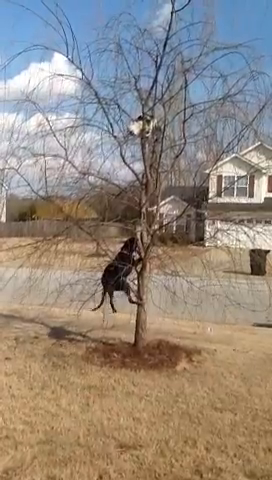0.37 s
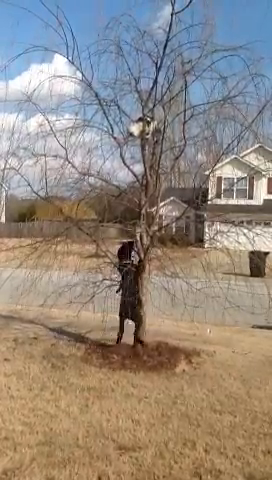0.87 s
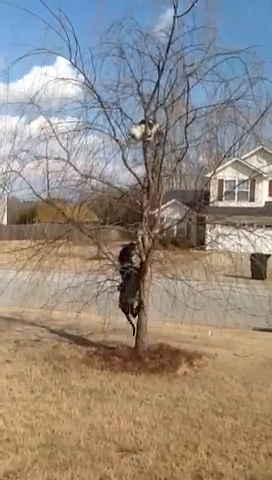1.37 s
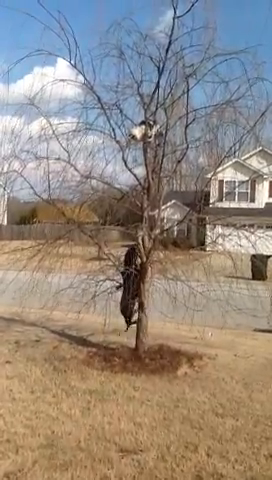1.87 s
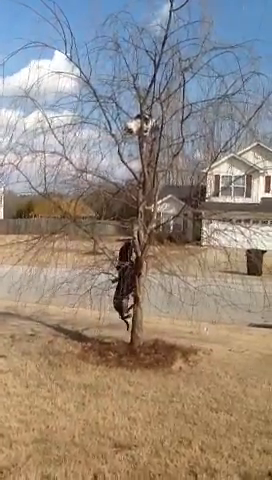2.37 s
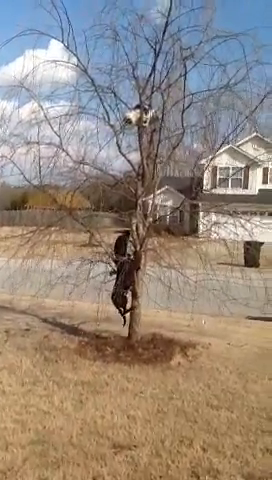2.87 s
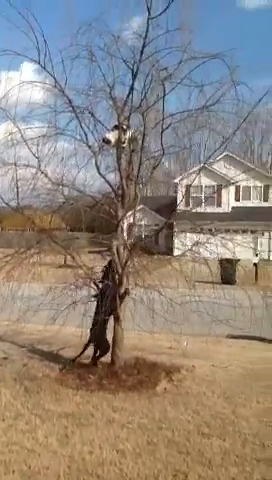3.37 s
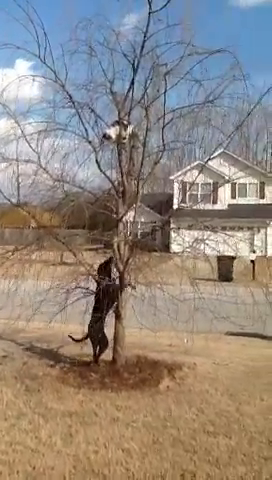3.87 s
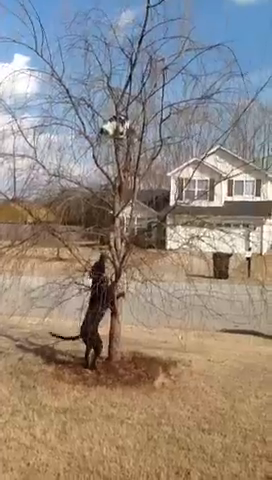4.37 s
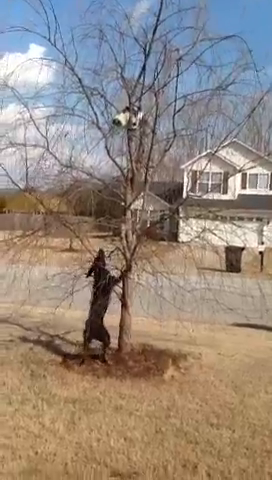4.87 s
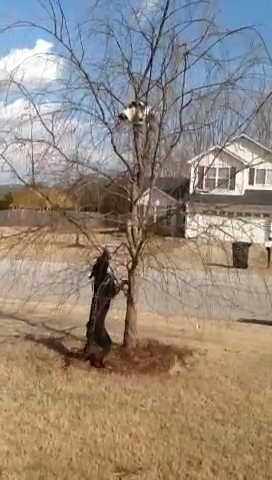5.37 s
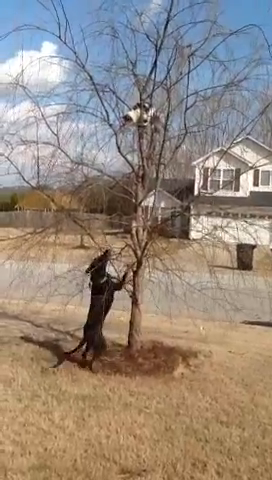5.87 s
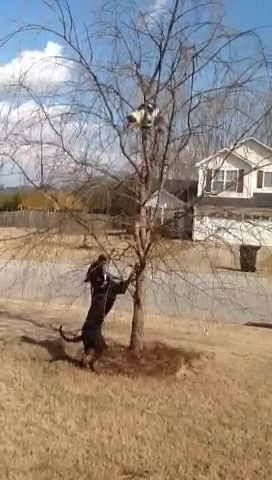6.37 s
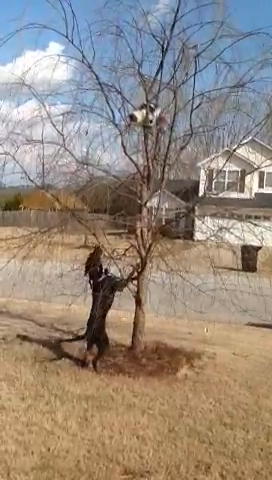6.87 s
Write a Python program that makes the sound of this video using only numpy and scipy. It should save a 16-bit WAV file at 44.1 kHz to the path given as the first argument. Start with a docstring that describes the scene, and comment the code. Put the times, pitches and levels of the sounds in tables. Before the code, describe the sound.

A quiet suburban yard with soft airy hiss. From 0.15 to 0.55 seconds a hound close by gives little low whimpers and thin arching squeaks, its claws scraping bark, with more scrapes around 0.9 and 1.1. Wind puffs bump the microphone near 1.0-1.3, and a far bird chirps upward at 1.2, then downward at 2.1. Thin squeaks return at 1.67-1.95. At 2.66 a long high whistle-like whine swells and breaks at 3.03 into the first bay, wavering and hoarse, until 3.6. Wind thumps from 3.4 to 4.2, with scrapes and twig ticks around 3.8-4.5. The second bay, 4.2-5.35, starts moderate and grows loud, cracking between registers. Its dull echo fades off the houses across the street. After a pause, a tiny squeak at 5.9 opens the third, longest bay, rough and fluttering, dipping near 6.65, then ringing loudly until the end at about 7.2.

```python
"""Hound baying under a tree

Close to the microphone a hound whimpers, squeaks, then bays three times, its voice jumping between registers:
harmonics of one wavering phase, with fuzzy bands and breath noise, pass through throat and muzzle filters.
Houses across the street return a dull noise-tail echo. A far bird chirps twice as gliding sines, claws scrape
bark and twigs tick as shaped noise. Wind thumps on the microphone as short pulses over a rumble,
and a quiet suburban hiss of coloured noise lies beneath."""
import sys
import numpy as np
from scipy import signal
from scipy.fft import rfft, irfft, next_fast_len
from scipy.io import wavfile
from scipy.ndimage import uniform_filter1d, map_coordinates

SR = 44100
rng = np.random.default_rng(int(sys.argv[2]) if len(sys.argv) > 2 else 0)


def waveform_to_disk(signal):
    """Save audio, clipped to [-1, 1], as 16-bit WAV at the path in sys.argv[1]."""
    frames = np.transpose(np.atleast_2d(signal))
    scaled = np.clip(frames, -1, 1) * 32767
    samples = np.round(scaled).astype(np.int16)
    wavfile.write(sys.argv[1], SR, samples)


def rack_gain(trim_db):
    """Turn a fader trim in dB into the linear factor to multiply a signal by."""
    fader = np.asarray(trim_db, float)
    return 10 ** (fader / 20)


N = 318834  # samples


def unit(x):
    """Bring to rms 1."""
    return x / np.sqrt(np.mean(x ** 2) + 1e-20)


def along(points, hz):
    """Interpolate (Hz, value) points on a log frequency axis."""
    f, v = np.transpose(points)
    return np.interp(np.log(hz + 1), np.log(f + 1), v)


def curves(rows):
    """One value per sample for each column after the time."""
    s, *cols = np.transpose(rows)
    return [np.interp(np.arange(N) / SR, s, c) for c in cols]


def phrases(tables, fade_s):
    """A gate that is open while any table sounds, and the joined curves of them all."""
    t = np.arange(N) / SR
    gate = 0
    for rows in tables:
        inside = np.minimum(t - rows[0][0], rows[-1][0] - t)
        gate = gate + np.clip(inside / fade_s + 1, 0, 1)
    return np.minimum(gate, 1) ** 2, curves([row for rows in tables for row in rows])


def wobble(rate):
    """A smooth random curve, rate knots a second."""
    knots = rng.standard_normal(int(N * rate / SR) + 4)
    return map_coordinates(knots, [np.arange(N) * rate / SR])


def filtered(x, spectrum):
    """Shape x by (Hz, dB) points."""
    m = next_fast_len(N + 8192)
    gain = rack_gain(along(spectrum, np.fft.rfftfreq(m, 1 / SR)))
    return irfft(rfft(x, m) * gain, m)[:N]


def noise(spectrum):
    """Coloured noise of rms 1."""
    return unit(filtered(rng.standard_normal(N), spectrum))


def phase(hz):
    """Running phase in radians of a moving pitch."""
    return 2 * np.pi * np.cumsum(hz) / SR


def sines(turn, levels_db, first):
    """Successive harmonics of a phase, each at its rms level."""
    return sum(np.sqrt(2) * rack_gain(db) * np.sin((first + k) * turn) for k, db in enumerate(levels_db))


# colour of the suburban hiss: freq_hz [Hz], density_db [dB per Hz, relative]
AIR_COLOUR = [(30, -53.5), (120, -11.5), (250, -1), (500, -1), (1200, -6.5), (2500, -10.5), (6000, -17),
              (15300, -18)]


def air():
    """Open-air hiss: coloured noise whose level drifts slowly."""
    return rack_gain(-61.5 + 2.6 * wobble(6.5)) * noise(AIR_COLOUR)


# wind rumble before the bass cut: time_s [s], level_db [dB]
WIND_LEVEL = [(.7, -65), (1.1, -52.5), (1.5, -64), (3.1, -65), (3.5, -52), (4.25, -52.5), (4.6, -56.5),
              (5.6, -66)]
# colour of the rumble: freq_hz [Hz], density_db [dB per Hz, relative]
RUMBLE_COLOUR = [(25, -66), (40, -33), (100, -3.5), (170, 1.5), (260, -2), (400, -33.5)]
# puffs on the microphone: start_s [s], level_db [dB, before trim and bass cut]
WIND_PUFFS = [(1.03, -27), (1.059, -26.5), (1.161, -31.5), (1.282, -35), (3.377, -19.5), (3.464, -26.5),
              (3.503, -29), (3.603, -26), (3.747, -20.5), (3.765, -21.5), (3.829, -27), (3.859, -18),
              (4.103, -33.5), (4.157, -15), (5.216, -44.5)]


def wind():
    """A lumpy rumble, and single puffs that push the membrane for about a cycle."""
    t = np.arange(N) / SR
    lumps = rack_gain(4 * wobble(25))
    out = rack_gain(curves(WIND_LEVEL)[0]) * unit(lumps * noise(RUMBLE_COLOUR))
    for start_s, level_db in WIND_PUFFS:
        hz = 165 * (1 + 0.051 * rng.standard_normal())
        cycles = (t - start_s) * hz - 1.2  # zero at the middle of the puff
        out += rack_gain(level_db - 7.5) * np.exp(-(cycles / 0.5) ** 2) * np.sin(2 * np.pi * cycles)
    return filtered(out, [(40, -13.5), (110, 0)])


# decay of the street's echo: freq_hz [Hz], t60_s [s to fall 60 dB]
HOUSE_DECAY = [(300, 0.41), (1200, 1.295), (2400, 1.05), (6000, 1.16)]


def street(x):
    """House fronts across the street blur their echoes into a dull tail of decaying noise."""
    hz, t, z = signal.stft(rng.standard_normal(SR), SR, nperseg=256)
    decay = rack_gain(-60 * t / along(HOUSE_DECAY, hz)[:, None])
    tail = signal.istft(z * decay, SR, nperseg=256)[1]
    delayed = np.pad(tail, (1500, 0))  # samples, 34 ms
    tail = rack_gain(-10.0) * delayed / np.linalg.norm(tail)
    stirred = x * rack_gain(4.5 * wobble(70) - 1)  # moving air smears steady tones
    return filtered(signal.fftconvolve(stirred, tail)[:N], [(2300, -6.0), (3300, -14), (7000, -8)])


# far bird: peak_s [s], pitch_hz [Hz at the peak], glide [Hz per s], level_db [dB at the peak]
BIRD_CHIRPS = [(1.174, 2280, 5527, -41), (2.123, 2120, -2500, -40.5)]


def bird():
    """Short far notes: a gliding sine that swells and fades."""
    rise_s, fall_s, edge_db = 0.027, 0.016, -21.5
    shape = [(-rise_s, edge_db), (0, 0), (fall_s, edge_db)]
    notes = [[(peak_s + lag, hz + glide * lag, level_db + db) for lag, db in shape]
             for peak_s, hz, glide, level_db in BIRD_CHIRPS]
    gate, (hz, db) = phrases(notes, 0.0043)
    return gate * sines(phase(hz), [db], first=1)


# claws on bark: start_s [s], body_db [dB], treble_db [dB], both before the grain
CLAW_SCRAPES = [(.16, -59.5, -66.5), (0.519, -47.5, -62), (0.871, -57.5, -54), (1.129, -55, -80.5),
                (2.102, -50.5, -85), (3.769, -60.5, -62), (3.939, -57, -86), (3.999, -59, -74.5)]
# twigs: start_s [s], level_db [dB, before a fixed lift]
TWIG_TICKS = [(3.904, -53.5), (3.916, -62.5), (4.129, -56), (4.3275, -44.5), (4.4931, -54.5)]


def claws():
    """Scrapes are grainy swells in the bark's body and its treble; twigs give one sharp tick."""
    t = np.arange(N) / SR
    grain = rack_gain(1.24 * wobble(370))
    body = grain * noise([(250, -40), (500, 0), (1200, 0), (2500, -8), (5000, -30)])
    fizz = grain * noise([(1500, -40), (4000, 0), (15000, -3)])
    out = np.zeros(N)
    for start_s, body_db, treble_db in CLAW_SCRAPES:
        progress = np.clip((t - start_s) / 0.082, 0, 1)
        swell = np.sin(np.pi * progress ** 0.34)  # peaks early
        out += swell * (rack_gain(body_db) * body + rack_gain(treble_db) * fizz)
    for start_s, level_db in TWIG_TICKS:
        decay_db = 60 * np.clip(t - start_s, 0, 1) / 0.015
        out += (t > start_s) * rack_gain(level_db + 10.5 - decay_db) * fizz
    return out


# steady whistle under the squeaks, one table a phrase: time_s [s], pitch_hz [Hz], level_db [dB]
HELD_PHRASES = [
    [(1.75, 2430, -63), (1.815, 2394, -65)],
    [(1.865, 2430, -59), (1.93, 2310, -65), (1.945, 2380, -75)],
]
# its harmonics 1-3: over_db [dB over level_db]
HELD_HARMONICS = [3.5, -10, -0.5]


def held_whistle():
    """A steady whistle whose harmonics flicker separately."""
    gate, (pitch, db) = phrases(HELD_PHRASES, 0.005)
    turn = phase(pitch * (1 + 0.00454 * wobble(54)))
    return gate * sum(rack_gain(5 * wobble(50)) * sines(turn, [db + over_db], first=k)
                      for k, over_db in enumerate(HELD_HARMONICS, 1))


# second whistle, one table a phrase: time_s [s], pitch_hz [Hz], level_db [dB, 3rd harmonic before flicker]
SECOND_PHRASES = [
    [(1.76, 3100, -62), (1.79, 3200, -60)],
    [(1.885, 3040, -57), (1.935, 3170, -59)],
    [(2.87, 3080, -61), (2.92, 3070, -52), (3.02, 3120, -56)],
]


def second_whistle():
    """A second pitch, heard only by its overtones 2-4."""
    gate, (pitch, db) = phrases(SECOND_PHRASES, 0.0082)
    turn = phase(pitch * (1 + .005 * wobble(60)))
    return gate * rack_gain(2.5 * wobble(40)) * sines(turn, [db - 8, db, db - 8], first=2)


# squeaks: start_s [s], rise_s [s], fall_s [s], from_hz [Hz], top_hz [Hz],
# level_db [dB, before flicker and filter], second_db [dB, 2nd harmonic over the 1st]
SQUEAK_ARCHES = [(0.309, 0.034, 0.028, 2560, 3600, -54.5, -22), (0.43, 0.035, .017, 2230, 2710, -55, -8),
                 (1.668, 0.03, 0.036, 3200, 3470, -57.5, -3),
                 (1.751, 0.032, 0.036, 2330, 3310, -52.5, -3.5), (1.868, 0.076, 0.022, 2270, 3750, -55, -1)]
# whimpers: start_s [s], length_s [s], from_hz [Hz], to_hz [Hz], level_db [dB, before flicker and filter]
WHIMPER_SLIDES = [(0.153, 0.089, 323, 479.4, -50.5), (0.275, 0.045, 3080, 2560, -59.5),
                  (0.508, 0.046, 714, 373.3, -46.5), (1.034, 0.017, 426, 428, -42.5),
                  (5.89, 0.036, 3400, 3200, -54)]
# long whistle: time_s [s], pitch_hz [Hz], first_db, second_db [dB, harmonics before flicker and filter]
LONG_WHISTLE = [(2.66, 3290, -63, -103), (2.74, 3300, -61.5, -51), (2.81, 3350, -54.5, -54.5),
                (2.86, 3280, -56, -50), (2.95, 3250, -57, -54), (3.03, 3340, -60, -93)]


def whine_shapes():
    """Squeaks arch up and fall to one rest pitch, whimpers slide one way: (s, Hz, 1st, 2nd harmonic dB)."""
    onset_db, end_db, rest_hz = -4, -7, 2350  # end levels are over the middle
    knee, knee_up = .5, .65  # most of the climb comes early: share of the rise time, share of the climb
    shapes = [LONG_WHISTLE]

    def add(points, level_db, second_db):
        shapes.append([(s, hz, level_db + db, level_db + db + second_db) for s, hz, db in points])

    for s, rise, fall, low, top, level_db, second_db in SQUEAK_ARCHES:
        add([(s, low, onset_db), (s + knee * rise, low + knee_up * (top - low), 0),
             (s + rise, top, 0), (s + rise + fall, rest_hz, end_db)], level_db, second_db)
    for s, length, a, b, level_db in WHIMPER_SLIDES:
        add([(s, a, onset_db), (s + length / 2, (a + b) / 2, 0), (s + length, b, end_db)], level_db, -16.5)
    return sorted(shapes)


def whines():
    """Thin whistles from nearly closed folds: three flickering harmonics and breath, with two more whistles."""
    gate, (pitch, first_db, second_db) = phrases(whine_shapes(), 0.0026)
    pitch = uniform_filter1d(pitch, size=500) * (1 + .011 * wobble(260))
    turn = phase(pitch)
    flicker_db, = curves([(2.5, 6), (2.6, 2.5), (3.1, 2.5), (3.2, 6)])  # the long whistle is steadier
    lines = sum(rack_gain(flicker_db * wobble(70) - 2) * sines(turn, [db], first=k)
                for k, db in enumerate([first_db, second_db, second_db - 20], 1))
    hiss = noise([(1200, -7.0), (2000, -4.0), (9000, -12.5), (15000, -15.5)])
    breath = rack_gain(first_db - 5.5) * (pitch > 1500) * hiss
    lines = filtered(lines, [(3700, 0), (4200, -15), (4600, 0), (5600, -6), (6300, 0)])
    return gate * (lines + breath) + held_whistle() + second_whistle()


# second vibration in the bays, one table a phrase: time_s [s], pitch_hz [Hz], level_db [dB, before the muzzle]
DRONE_PHRASES = [
    [(4.79, 422, -47), (4.87, 463.6, -32.5), (4.91, 455.5, -38), (5.06, 439, -37), (5.12, 536, -21.5),
     (5.19, 526, -56.5)],
    [(6.56, 919, -22), (6.575, 966, -15), (6.6, 954, -15.5), (6.622, 800, -20)],
]


def drones():
    """A second, independent vibration as one wavering sine at 0.94 of the listed pitch."""
    gate, (hz, db) = phrases(DRONE_PHRASES, 0.011)
    return gate * sines(phase(hz * (1 + 0.019 * wobble(55))), [db], first=0.94)


# bays, one table each: time_s [s], pitch_hz [Hz, before waver], level_db [dB, low voice before the muzzle],
# mouth [harmonic 1-4 that the mouth is tuned to, may lie between or beyond]
BAY_PHRASES = [
    [(3.03, 432, -27, 3.36), (3.055, 417.4, -33.5, 2.9), (3.085, 411.5, -23.5, 2.9), (3.094, 370, -42, 3.3),
     (3.098, 518, -32, 2.5), (3.12, 467, -22, 1.4), (3.14, 458, -18, 2.62), (3.146, 548.6, -28, 1.62),
     (3.2, 566.8, -26.5, 1.35), (3.26, 435.6, -30, 1.52), (3.44, 422, -32.5, 1.45), (3.446, 387, -30, 1.34),
     (3.5, 342, -31, 1.35), (3.56, 455, -26, 1.32), (3.59, 409, -24.5, 1.5), (3.625, 424, -40, 1.88)],
    [(4.19, 330, -32.5, 1.24), (4.245, 390.5, -23, 1.31), (4.251, 336.8, -28.5, 1.28),
     (4.42, 390.6, -22, 1.15), (4.56, 406.8, -23.5, 1.26), (4.717, 499, -22, 1.29),
     (4.723, 378.4, -20.5, 1.55), (4.75, 342.9, -17.5, 2), (4.82, 397.8, -16, 2.1), (4.86, 399.6, -8, 2.1),
     (4.9, 396.3, -12.5, 2.51), (4.98, 280.2, -17, 1.8), (5.02, 373.7, -21, 2), (5.052, 394, -21, 2.67),
     (5.061, 407.3, -5, 1.97), (5.13, 399.3, -15.5, 2.41), (5.19, 393.3, -14, 2.29),
     (5.208, 363, -21.5, 2.03), (5.214, 528.3, -11.5, 1.51), (5.23, 502.6, -7, 0.79),
     (5.258, 452, -15.5, 1.41), (5.28, 413.3, -12.5, 0.63), (5.35, 387, -24.5, 1.8)],
    [(5.905, 417, -34.5, 1.4), (5.919, 448.5, -31.5, 2.3), (5.927, 463, -24, 1.8),
     (5.965, 468.5, -28.5, 1.9), (5.975, 471.8, -19, 1.56), (6.025, 479, -21.5, 1.39),
     (6.05, 442.5, -25.5, 2.7), (6.09, 476.8, -19, 1.85), (6.115, 468, -22.5, 1.68),
     (6.13, 485, -15.5, 1.55), (6.19, 448.4, -26, 1.39), (6.26, 496.3, -11.5, 1.62),
     (6.305, 485.2, -11.5, 1.564), (6.34, 455, -27.5, 1.71), (6.38, 416.8, -32, 1.3),
     (6.42, 473, -23.5, 1.55), (6.448, 454.5, -29, 1.8), (6.454, 379.3, -31.5, 2.64),
     (6.5, 381.9, -26, 2.5), (6.55, 405, -21.5, 2.5), (6.575, 405.6, -22, 2.37), (6.605, 407, -20.5, 2.05),
     (6.625, 362.9, -26.5, 1.66), (6.655, 350.6, -32, 1.55), (6.672, 328, -20, 3.8), (6.7, 341, -23, 6.3),
     (6.715, 394.7, -18.5, 2.62), (6.745, 420.4, -18, 2.487), (6.755, 439.6, -17.5, 3.8),
     (6.79, 441, -9.5, 2.8), (6.818, 443.4, -8.5, 2.5), (6.826, 504, -9.5, 2.26), (6.85, 490, -6, 1.63),
     (6.918, 495.2, -13, 2.16), (6.928, 408.5, -18.5, 2.51), (6.98, 393.8, -22.5, 2.33),
     (7.062, 421.7, -17.5, 2.53), (7.072, 436.5, -12, 2.8), (7.11, 434.3, -12.5, 2.56),
     (7.175, 475.6, -11.5, 2), (7.229, 491.6, -12, 2.23)],
]
# registers: start_s [s], lock [multiple of the pitch the folds lock to], rough [0-1],
# half_db [dB, halfway lines over the upper voice, before trim]
VOICE_REGISTERS = [(3, 3, .1, -30), (3.095, 2, .2, -20), (3.143, 1, .66, -2), (3.443, 1, .28, -20),
                   (4.248, 1, .28, -4), (4.56, 1, .6, -6), (4.775, 2, .2, -20), (4.9, 1, .6, -8),
                   (5.02, 1, .3, -20), (5.055, 2, .3, -20), (5.12, 1, .25, -20), (5.8, 2, .05, -30),
                   (5.968, 1, .3, -20), (6.03, 1, .52, -10), (6.113, 1, .35, -20), (6.17, 1, .55, -12),
                   (6.216, 1, .15, -30), (6.336, 1, .52, -10), (6.451, 1, .5, 2), (6.51, 1, .3, 3),
                   (6.57, 1, .35, -6), (6.615, 1, .25, -20), (6.665, 1, .55, -6), (6.71, 1, .45, 3),
                   (6.75, 3, .15, -20), (6.822, 2, .12, -20), (6.923, 1, .3, 3), (7.067, 1, .2, -15),
                   (7.115, 1, .4, 2)]
# upper voice: time_s [s], level_db [dB over the low voice, before the throat]
UPPER_LEVEL = [(3.03, -24), (3.11, -24), (3.14, -22.5), (3.16, -16.5), (3.44, -14.5), (3.6, -23.5),
               (4.2, -13.5), (4.42, -19), (4.7, -14.5), (4.8, -9.5), (4.86, -22), (5.04, -4), (5.065, -30),
               (5.19, -9), (5.23, -22.5), (5.35, -17.5), (5.9, -11), (5.945, -0.5), (5.98, -11), (6.3, -14),
               (6.35, -9.5), (6.6, -10.5), (6.645, -5), (6.68, -11), (6.8, -19), (6.86, -40), (6.93, -11),
               (7.2, -20)]
# treble: time_s [s], level_db [dB over effort]
TREBLE_LEVEL = [(3.05, -24), (3.15, -10.5), (3.6, -28), (4.4, -17.5), (4.7, -27), (4.85, -19.5),
                (5.18, -15), (5.3, -25), (5.95, -35), (6.12, -24), (6.3, -29), (6.55, -19), (7.2, -20)]
# filters. throat, on voiced lines: freq_hz [Hz], gain_db [dB]
THROAT_FILTER = [(250, -33), (500, 3.5), (1300, 5), (1650, 2.5), (2300, 3), (2520, -9), (2750, -30),
                 (4200, -70)]
# muzzle, on high lines: freq_hz [Hz], gain_db [dB]
MUZZLE_FILTER = [(2500, -30), (3600, -20), (4050, -10), (4350, -17), (4750, -3), (5550, 0), (9000, -4),
                 (15400, -20)]
# noises. leaking air: freq_hz [Hz], density_db [dB per Hz, relative]
HOARSE_COLOUR = [(260, -91.5), (400, 15.5), (900, 7), (1350, 18), (1700, -2), (2300, 0), (2500, -4),
                 (2750, -32), (4200, -70)]
# hoarse treble: freq_hz [Hz], density_db [dB per Hz, relative]
RASP_COLOUR = [(2700, -40), (3300, -16), (4200, -15), (4700, 6), (5200, -7), (6000, -9), (7300, -1),
               (7900, -12), (8600, -4), (9500, -13), (15400, -13)]
# band that a wide mouth adds: freq_hz [Hz], density_db [dB per Hz, relative]
GAPE_COLOUR = [(4800, -35), (5500, 7), (6400, -35)]


def bays():
    """Vocal folds through throat and muzzle: rough registers waver in pitch and size and leak air each cycle."""
    mouth_db, locked_db = 32, 17  # loss per harmonic off the mouth's tuning; loss of lines locked folds skip
    gate, (pitch, level_db, mouth) = phrases(BAY_PHRASES, .01)
    upper_db = level_db + curves(UPPER_LEVEL)[0]
    start, lock, rough, half_db = np.transpose(VOICE_REGISTERS)
    row = np.maximum(np.searchsorted(start, np.arange(N) / SR) - 1, 0)
    lock = lock[row]
    rough, half_db = uniform_filter1d([rough[row], half_db[row]], size=1300)  # registers blend in 30 ms

    # the mouth's tuning shares the low voice among harmonics 1-4
    low_k = np.arange(1, 5)[:, None]
    skipped = uniform_filter1d(1. * (low_k % lock > 0), size=400)
    share_db = -mouth_db * abs(low_k - mouth) - locked_db * skipped
    low_db = level_db + share_db - 20 * np.log10(np.linalg.norm(rack_gain(share_db), axis=0))

    turn = phase(pitch * (1 + .005 * wobble(50) + .07 * rough ** 2 * wobble(130)))
    flutter, grit = rack_gain(3.5 * wobble(25)), wobble(170)

    def shimmer(k):
        """Every line flickers by its own shifted curve, and a rough one spreads into a fuzzy band."""
        fuzzy = np.sqrt(1 - rough ** 2) + rough * np.roll(grit, 9000 * k)
        return np.roll(flutter, 9000 * k) * fuzzy

    on = gate > 0
    upper, half, high = np.zeros((3, N))
    broken = rack_gain(5 * wobble(45))  # high lines come and go
    for k in range(1, 32):
        lock_gain = np.where(k % lock[on], .08 + .3 * (k > 8), 1)
        scatter = .4 * k * k  # radians
        line = np.clip(k - 2.1, 0, 1) * lock_gain * shimmer(k)[on] * np.cos(k * turn[on] + scatter)
        upper[on] += line
        high_gain = np.roll(broken, 7000 * k)[on] * rack_gain(-.35 * k)  # each harmonic is weaker
        high[on] += line * high_gain * (1 - rough[on]) ** 4
        # every second pulse is weaker, which puts lines halfway between the harmonics
        half[on] += (k < 8) * shimmer(-k)[on] * np.cos((k - .5) * turn[on] + scatter)
    upper *= np.sqrt(pitch * lock / 550)  # fewer lines share the same power
    tones = rack_gain(upper_db) * (np.sqrt(1 - rough) * upper + rack_gain(half_db - 7.0) * half)

    puffing = 1 + .9 * np.cos(turn)
    leak = rack_gain(upper_db + 8.0) * rough * puffing * noise(HOARSE_COLOUR)

    fuzz = .9 + .3 * wobble(300)  # high lines spread into fuzzy bands
    gape = np.clip(mouth - 1, .2, 1)  # a mouth tuned high is wide open
    effort = rack_gain(uniform_filter1d(.7 * upper_db + 0.15 * level_db + 3.5, size=3000))
    slide = uniform_filter1d(abs(np.gradient(pitch)) * SR / 1500, size=400)
    steady = 1 / (1 + slide ** 2)  # pitch jumps weaken the high lines
    treble = gate * effort * rack_gain(curves(TREBLE_LEVEL)[0])
    high_lines = rack_gain(4) * steady * gape * treble * fuzz * high * np.sqrt(lock)
    rasp = rack_gain(-3.5 + wobble(170)) * treble * puffing * rng.standard_normal(N)
    bright = filtered(high_lines, MUZZLE_FILTER)
    bright += filtered(rasp, RASP_COLOUR) + filtered(rasp * gape, GAPE_COLOUR)

    low = np.zeros(N)
    for k, db in enumerate(low_db, 1):
        low += (1 - rough + rough * shimmer(k)) * sines(turn, [db], first=k)
    for k in (1.5, 2.5, 3.5):  # halfway lines near the mouth's tuning
        line_db = level_db + half_db - 6 - mouth_db * abs(k - mouth)
        low += shimmer(-int(2 * k)) * sines(turn, [line_db], first=k)

    body = gate * (low + leak) + filtered(gate * tones, THROAT_FILTER) + drones()
    return filtered(body, [(230, -56.0), (320, -1.0)]) + bright  # a small muzzle radiates no bass


def scene():
    """Dog, bird and claws in the street; wind and air at the microphone."""
    far = bird()
    dog = claws() + whines() + bays()
    echo = street(dog + rack_gain(5.5) * far)
    return (air() + wind() + echo + far + dog)[None]


def low_pass(x):
    """Removes everything above the highest recorded frequency."""
    return signal.sosfilt(signal.butter(12, 15500, fs=SR, output="sos"), x)


def record(dry):
    """Take down the finished mono mix."""
    return low_pass(dry)


dry = scene()
out = record(dry)
waveform_to_disk(out)
```